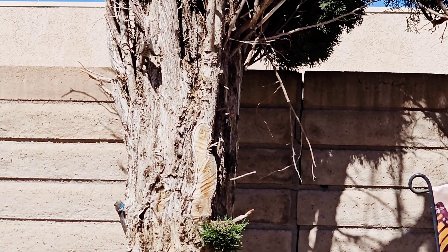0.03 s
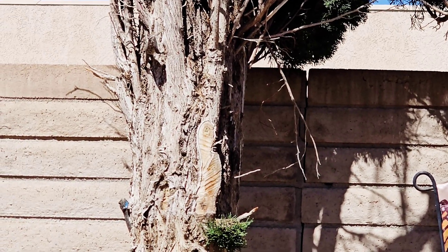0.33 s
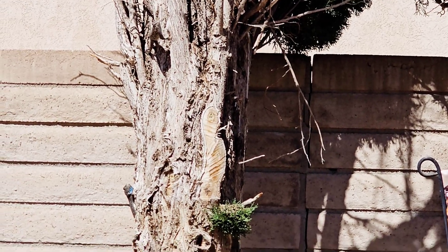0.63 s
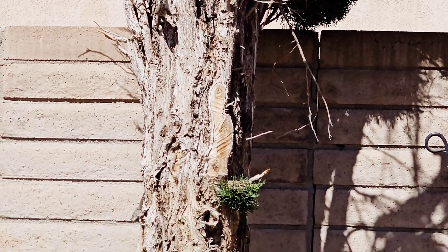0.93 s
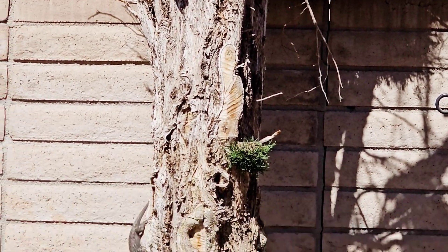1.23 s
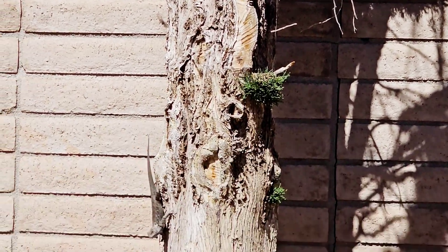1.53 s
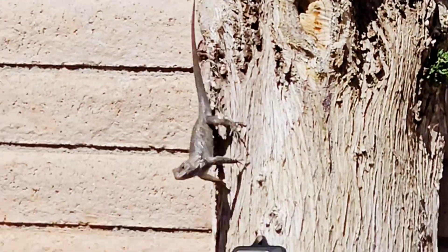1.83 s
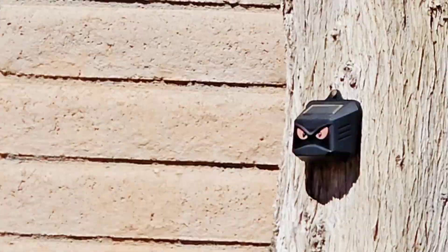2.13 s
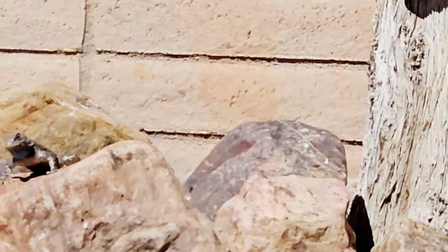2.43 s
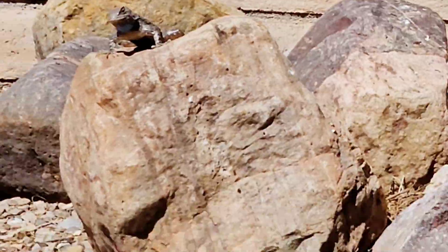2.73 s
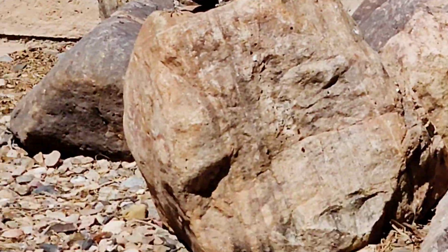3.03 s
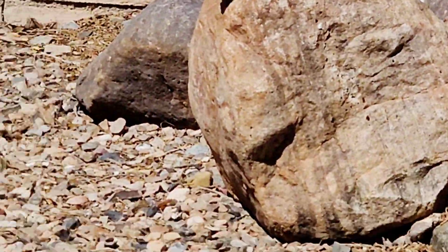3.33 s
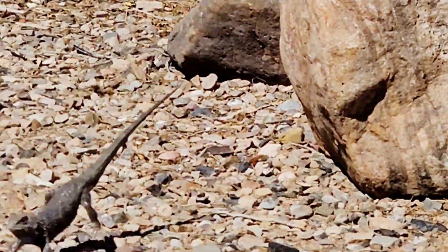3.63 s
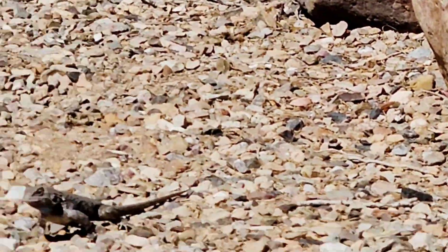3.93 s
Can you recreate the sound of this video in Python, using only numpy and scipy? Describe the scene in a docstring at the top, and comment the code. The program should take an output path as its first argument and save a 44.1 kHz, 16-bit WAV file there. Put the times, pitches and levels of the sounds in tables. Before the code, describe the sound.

A low rumble from a far engine and traffic runs throughout, outdoors. Close by, a lizard makes short, faint rustles on a tree trunk. An electrical crackle cuts in once, then more rustles follow, the last near the end.

```python
"""Sunny yard with a lizard.

A distant engine drones near 60 Hz in a low rumble, over a wash of far traffic, tyre whines and air.
Close by, a lizard scurries in short dry rustles: gritty hiss, ringing bark, ticks of catching fibres.
Once, a few abrupt signal jumps make a brief electrical crackle."""
import sys
import numpy as np
from scipy import signal
from scipy.fft import rfft, irfft
from scipy.io import wavfile

SR = 44100
rng = np.random.default_rng(int(sys.argv[2]) if len(sys.argv) > 2 else 0)


def generate_wav(sig):
    """Save sig (samples, or channels by samples) to the path in sys.argv[1] as 16-bit PCM at SR."""
    pcm = np.round(np.clip(np.atleast_2d(sig).T, -1, 1) * 32767).astype(np.int16)
    wavfile.write(sys.argv[1], SR, pcm)


N = 176400

# Each row: time in seconds, level of the deep drone in dB.
DRONE_LEVEL = [(0.0, -35), (0.07, -52), (0.13, -38.5), (0.28, -59.5), (0.33, -40), (0.37, -56),
               (0.44, -37.5), (0.62, -49.5), (0.67, -40.5), (0.69, -51), (0.75, -35.5), (0.8, -50),
               (0.85, -41), (0.96, -44.5), (0.99, -33), (1.07, -44), (1.27, -34.5), (1.29, -38),
               (1.88, -39.5), (1.9, -45), (2.06, -35.5), (2.13, -42), (2.18, -34.5), (2.37, -47),
               (2.43, -33), (2.6, -39), (2.73, -32.5), (2.77, -38), (2.8, -47.5), (2.93, -30), (3.05, -40),
               (3.07, -33.5), (3.24, -37), (3.31, -49), (3.34, -39), (3.45, -34), (3.48, -41.5),
               (3.61, -31.5), (3.64, -38.5), (3.8, -33.5), (3.83, -41), (4.0, -33.5)]
# Low wind noise. Each row: frequency in Hz, relative density in dB.
WIND_SPECTRUM = [(12, -21), (25, -11), (38, 0.5), (50, 4.5), (74, -1), (88, -5), (110, -13.5), (200, -32),
                 (500, -69.5), (2000, -120)]
# Second engine tone. Each row: time in seconds, pitch in Hz.
HUM_PITCH = [(0, 113), (.6, 116), (1.1, 124), (2, 118.7), (3, 116.7), (4, 118.7)]
# Low road noise. Each row: frequency in Hz, relative density in dB.
ROAD_SPECTRUM = [(50, -20), (80, -3.5), (104, 0.5), (140, -10), (200, -15.5), (300, -25), (600, -54),
                 (2000, -110)]
# Each row: multiple of the engine pitch, width in Hz, relative level in dB.
ENGINE_ORDERS = [(1.919, 13.3, -5.5)]
# Hum, upper order and road noise together. Each row: time in seconds, level in dB.
OVERTONE_LEVEL = [(0, -54.5), (.6, -50.5), (1.1, -49), (1.6, -44), (2.1, -47.5), (2.35, -46), (2.8, -46),
                  (3.3, -46), (3.6, -46), (4, -42.5)]
# Each row: time in seconds, level of the hollow boom in dB.
BOOM_LEVEL = [(0, -65.5), (.62, -67), (.73, -56.5), (.85, -66), (1.65, -67.5), (1.98, -57.5), (2.1, -63),
              (2.45, -63), (2.63, -55), (2.85, -65.5), (3.16, -54.5), (3.45, -63.5), (4, -55.5)]
# Traffic and air. Each row: frequency in Hz, relative density in dB.
WASH_SPECTRUM = [(100, -18), (180, 0.5), (260, 1), (340, -3.5), (500, 0), (700, -0.5), (900, -0.5),
                 (1200, -3), (1550, -5), (2000, -12.5), (2700, -20.5), (3500, -24), (4400, -22.5),
                 (5500, -34.5), (6600, -43), (8300, -60.5), (10500, -52), (12000, -44.5), (16000, -41)]
# Each row: frequency in Hz, left minus right in dB.
WASH_PAN = [(300, .3), (700, 0.5), (1300, 2), (2400, 5), (4300, -4.5), (8000, 30), (15000, -2)]
# Each row: frequency in Hz, left-right correlation.
WASH_CORRELATION = [(150, .88), (300, .62), (550, .3), (1000, -.03), (4000, -.05), (12000, -.1)]
# Each row: time in seconds, gain of the traffic in dB.
TRAFFIC_GAIN = [(0, -56.5), (1.5, -57), (2.4, -55), (3.2, -56.5), (4, -53)]
# Each row: centre in Hz, width in Hz, first and last mean level in dB.
TYRE_WHINES = [(494, 60, -74, -64), (1072, 79, -74.5, -65), (1195, 87, -76.5, -64), (785, 60, -70, -71.5),
               (574, 35, -76.5, -66), (375, 45, -76.5, -68.5)]
# Each row: peak time in seconds, centre in Hz, width in Hz, level in dB, rise and decay in seconds.
FAR_SWISHES = [(.015, 4130, 350, -76, 0.04), (.10, 3950, 350, -77, .035), (0.183, 3650, 300, -82, .03),
               (0.472, 3400, 800, -74.5, 0.033)]
# Each row: peak time in seconds, relative hiss and scrape levels in dB, rise and decay in seconds.
SCURRIES = [(.83, -74, -80, 0.017, 0.02), (.91, -81, -83, 0.034, 0.046), (.98, -67, -74, 0.035, 0.041),
            (1.045, -71, -77, 0.018, 0.043), (1.105, -70.5, -74, 0.024, 0.042),
            (1.16, -75.5, -74, 0.014, 0.035), (1.245, -69, -73.5, 0.032, .05),
            (1.372, -70, -75, 0.011, 0.024), (1.412, -72.5, -74.5, .018, 0.037),
            (1.835, -71, -73.5, 0.033, 0.049), (1.905, -65.5, -74, 0.034, .05),
            (1.98, -73, -77, 0.044, 0.022), (2.215, -74, -83, 0.026, .035), (2.32, -86, -98, 0.017, 0.033),
            (2.395, -81.5, -100, .025, .045), (3.435, -84.5, -84, 0.02, .035),
            (3.749, -67.5, -77, 0.028, .04), (3.835, -74.5, -89, 0.02, 0.035)]
# Rustle hiss. Each row: frequency in Hz, relative density in dB.
HISS_SPECTRUM = [(2000, -29.5), (5000, -8), (7000, -13), (8500, -11.5), (10200, -6), (11600, 1.5),
                 (13500, -2), (14500, 2), (16000, -0.5)]
# Dry bark resonances. Each row: centre in Hz, width in Hz, relative level in dB.
BARK_MODES = [(3770, 270, -4), (4260, 250, -1), (4660, 300, -2.5), (5150, 570, -6)]
# Woody rasp. Each row: frequency in Hz, relative density in dB.
WOOD_SPECTRUM = [(1500, -58), (3000, -4.5), (4300, 5), (4900, -2), (5700, -19), (7500, -38)]
# Each row: peak time in seconds, snap level in dB, woody ring level in dB.
FIBRE_TICKS = [(.976, -64, -63), (1.261, -69, -62), (1.413, -76, -59.5), (1.841, -47, -62),
               (1.902, -63, -70), (1.919, -58, -73)]
# Bright snap of a tick. Each row: frequency in Hz, relative density in dB.
SNAP_SPECTRUM = [(5000, -24), (8000, -18), (8900, -1), (9800, 1), (11000, -18), (13200, -7), (14500, -13),
                 (16000, -2)]
# Electrical crackle. Each row: time in seconds, signed height.
CRACKLE_JUMPS = [(1.5825, 0.022), (1.5833, -0.0074), (1.5855, 0.011), (1.5909, 0.0091)]

ENGINE_HZ, PITCH_WAVER, LOW_CORRELATION = 61.12, .012, .95
TIME_S = np.arange(N) / SR
BINS_HZ = np.maximum(np.fft.rfftfreq(N, 1 / SR), 1)


def undb(db):
    """Decibels to gain."""
    return 10 ** (np.asarray(db) / 20)


def envelope(rows):
    """Gain through (s, dB) points."""
    return undb(np.interp(TIME_S, *np.array(rows).T))


def over_hz(rows):
    """Join (Hz, value) points on a log axis."""
    hz, value = np.array(rows).T
    return np.interp(np.log(BINS_HZ), np.log(hz), value)


def unit(x):
    """Scale to rms 1."""
    return x / np.sqrt(np.mean(x ** 2))


def pan(db):
    """Stereo gains for a left-minus-right level."""
    return undb(np.array([[1], [-1]]) * db / 2)


def resonance(hz, width_hz):
    """Gain of a steep spectral peak."""
    return 1 / (1 + ((BINS_HZ - hz) / width_hz) ** 2) ** 2


def noise(gain, correlation=0):
    """Stereo noise, rms 1, with a given spectrum and left-right correlation."""
    mid, side = rfft(rng.standard_normal((2, N)))
    stereo = np.sqrt(1 + correlation) * mid + np.sqrt(1 - correlation) * side * np.array([[1], [-1]])
    return unit(irfft(gain * stereo, N))


def wander(rate_hz):
    """Smooth random motion, rms 1."""
    return unit(irfft(rfft(rng.standard_normal(N)) * np.exp(-(BINS_HZ / rate_hz) ** 2), N))


def burst(peak_s, rise_s, decay_s):
    """Gaussian rise, exponential decay."""
    t = TIME_S - peak_s
    return np.exp(-(np.minimum(t, 0) / rise_s) ** 2 - np.maximum(t, 0) / decay_s)


def steadied(x, window_s=.11, strength=.93):
    """Even out slow random swells; rms 1."""
    power = irfft(rfft(np.mean(x ** 2, axis=0)) * np.exp(-(BINS_HZ * window_s) ** 2), N)
    return unit(x / np.abs(power) ** (strength / 2))


def engine_tone(hz, waver_hz, throb_db, throb_hz):
    """Sine wavering in pitch and level; rms 1."""
    phase = 2 * np.pi * np.cumsum(hz * (1 + PITCH_WAVER * wander(waver_hz))) / SR
    return unit(np.sin(phase) * undb(throb_db * wander(throb_hz)))


def engine_drone():
    """Engine tone, blurred by distance, in low wind noise; the whole swells and sinks."""
    tone = undb(-1.5) * engine_tone(ENGINE_HZ, waver_hz=4, throb_db=.8, throb_hz=7.1)
    blur = undb(-8.5) * noise(resonance(ENGINE_HZ, width_hz=12), LOW_CORRELATION)
    wind = undb(-8) * noise(undb(over_hz(WIND_SPECTRUM)), LOW_CORRELATION)
    return steadied(tone + blur + wind) * envelope(DRONE_LEVEL) * pan(.34)


def engine_overtones():
    """Higher engine hum and a blurred upper order over low road noise."""
    hum_hz = np.interp(TIME_S, *np.array(HUM_PITCH).T)
    hum = undb(-5) * engine_tone(hum_hz, waver_hz=6, throb_db=2.5, throb_hz=8)
    road = undb(-4.5) * noise(undb(over_hz(ROAD_SPECTRUM)), LOW_CORRELATION)
    orders = sum(undb(db) * noise(resonance(multiple * ENGINE_HZ, width_hz), LOW_CORRELATION)
                 for multiple, width_hz, db in ENGINE_ORDERS)
    return steadied(hum + road + orders) * envelope(OVERTONE_LEVEL)


def engine_boom():
    """Hollow, blurred note of the far engine; comes and goes."""
    return steadied(noise(resonance(hz=234.2, width_hz=22), correlation=.8)) * envelope(BOOM_LEVEL)


def far_noise(gain):
    """Noise with the stereo spread of the far traffic."""
    return noise(gain * pan(over_hz(WASH_PAN)), over_hz(WASH_CORRELATION))


def traffic_and_air(air_from_hz=2600, air_gain_db=-56.5, flicker_hz=27, flicker_db=1.52):
    """Far traffic in separately wavering third-octave bands; steady air hiss above."""
    spectrum = rfft(far_noise(undb(over_hz(WASH_SPECTRUM))))
    edges_hz = np.append(0, np.geomspace(200, air_from_hz, 12))
    traffic = 0
    for low_hz, high_hz in zip(edges_hz, edges_hz[1:]):
        band = irfft(spectrum * ((BINS_HZ >= low_hz) & (BINS_HZ < high_hz)), N)
        traffic += band * undb(flicker_db * wander(flicker_hz))
    air = irfft(spectrum * (BINS_HZ >= edges_hz[-1]), N)
    return traffic * envelope(TRAFFIC_GAIN) + undb(air_gain_db) * air


def tyre_whines(waver_db=3.3, waver_hz=6.7):
    """Faintly pitched, wavering tyre noise; most bands swell as traffic nears."""
    out = 0
    for hz, width_hz, first_db, last_db in TYRE_WHINES:
        band = far_noise(resonance(hz, width_hz))
        out += band * undb(np.linspace(first_db, last_db, N) + waver_db * wander(waver_hz))
    return out


def swishes():
    """Faint narrow-band puffs of hiss, to the right."""
    return sum(undb(db) * noise(resonance(hz, width_hz)) * burst(peak_s, slope_s, slope_s)
               for peak_s, hz, width_hz, db, slope_s in FAR_SWISHES) * pan(-6.5)


def grit(snaps_per_s=260, spread_db=3.8, decay_s=.001, depth_db=1):
    """Gain that roughens a rustle: sparse tiny snaps of random size."""
    snaps = (rng.random(N) < snaps_per_s / SR) * undb(spread_db * rng.standard_normal(N))
    power = signal.lfilter([1], [1, -np.exp(-1 / (decay_s * SR))], snaps ** 2)
    return np.sqrt(1 + undb(depth_db) ** 2 * power / power.mean())


def bark_scrape(catch_hz=70, catch_db=4):
    """Bark resonances catch and let go independently, over a broader rasp."""
    rings = sum(undb(db) * noise(resonance(hz, width_hz)) * undb(catch_db * wander(catch_hz))
                for hz, width_hz, db in BARK_MODES)
    rasp = undb(-4.5) * noise(undb(over_hz(WOOD_SPECTRUM)))
    return unit(unit(rings) + rasp)


def lizard_rustles():
    """Each scurry: a grainy hiss and a lower scrape. Overlaps add in power."""
    hiss_power = scrape_power = 0
    for peak_s, hiss_db, scrape_db, rise_s, decay_s in SCURRIES:
        shape = burst(peak_s, rise_s, decay_s)
        hiss_power += (undb(hiss_db) * shape) ** 2
        scrape_power += (undb(scrape_db) * shape) ** 2
    grains = unit(noise(undb(over_hz(HISS_SPECTRUM)), correlation=-.18) * grit())
    hiss = undb(3.5) * grains * np.sqrt(hiss_power)
    scrape = undb(3) * bark_scrape() * np.sqrt(scrape_power)
    return hiss * pan(2) + scrape * pan(-3.5)


def fibre_ticks(rise_s=.00046, snap_decay_s=.0026, ring_decay_s=.0047):
    """Dry fibres catch and let go: a bright snap, a short woody ring."""
    snap_gain = sum(undb(db) * burst(peak_s, rise_s, snap_decay_s) for peak_s, db, _ in FIBRE_TICKS)
    ring_gain = sum(undb(db) * burst(peak_s, rise_s, ring_decay_s) for peak_s, _, db in FIBRE_TICKS)
    snap = snap_gain * noise(undb(over_hz(SNAP_SPECTRUM)))
    ring = ring_gain * noise(undb(over_hz(WOOD_SPECTRUM)))
    return snap * pan(5) + ring * pan(-3.5)


def electrical_crackle(decay_s=.0022):
    """The signal jumps and relaxes, in both channels at once."""
    return sum(height * burst(at_s, 1 / SR, decay_s) for at_s, height in CRACKLE_JUMPS) * pan(2.5)


def scene():
    """Far engine and traffic, near lizard, one crackle."""
    engine = engine_drone() + engine_overtones() + engine_boom()
    background = traffic_and_air() + tyre_whines() + swishes()
    lizard = lizard_rustles() + fibre_ticks()
    return engine + background + lizard + electrical_crackle()


def record(dry, fade_s=.006, cutoff_hz=15800):
    """Short fades at both ends, then a steep low-pass."""
    fade = np.minimum(np.minimum(TIME_S, TIME_S[::-1]) / fade_s, 1)
    lowpass = signal.ellip(10, .2, 70, cutoff_hz, fs=SR, output="sos")
    return signal.sosfilt(lowpass, dry * fade)


dry = scene()
out = record(dry)
generate_wav(out)
```